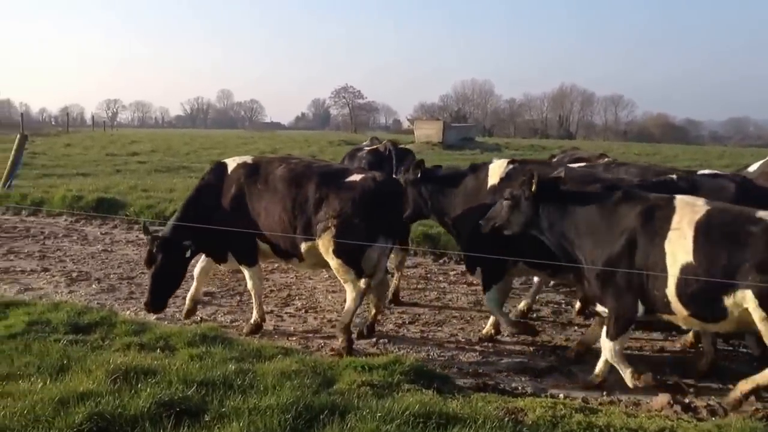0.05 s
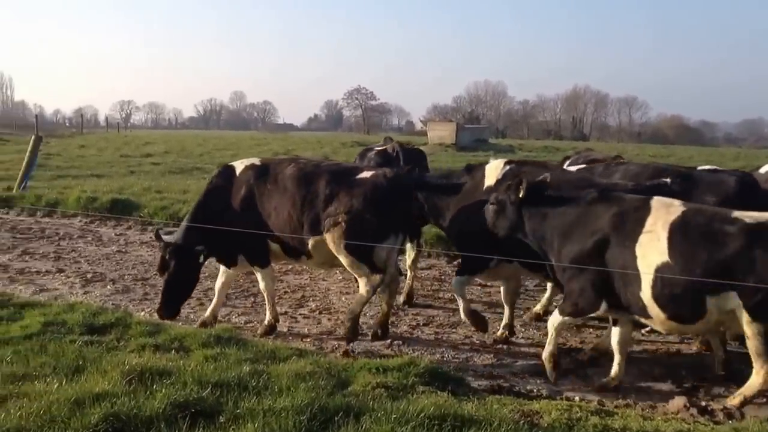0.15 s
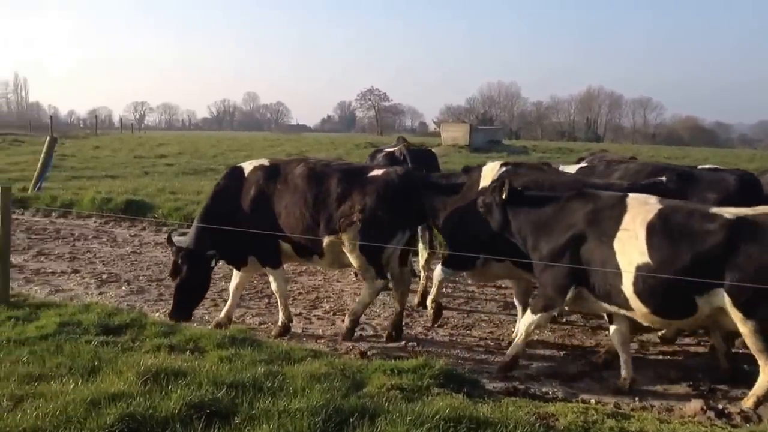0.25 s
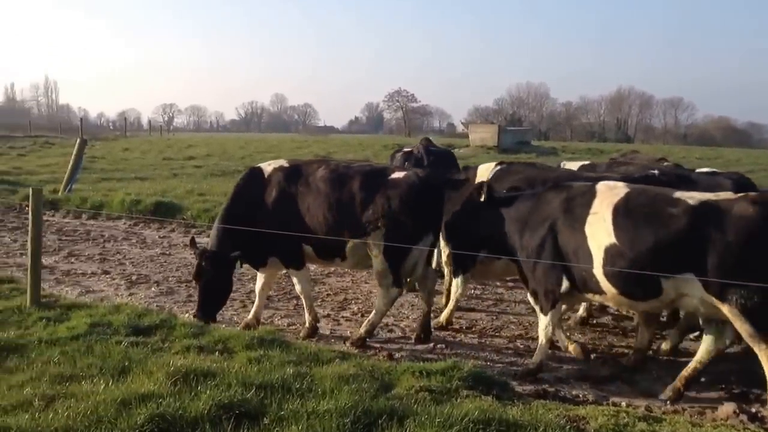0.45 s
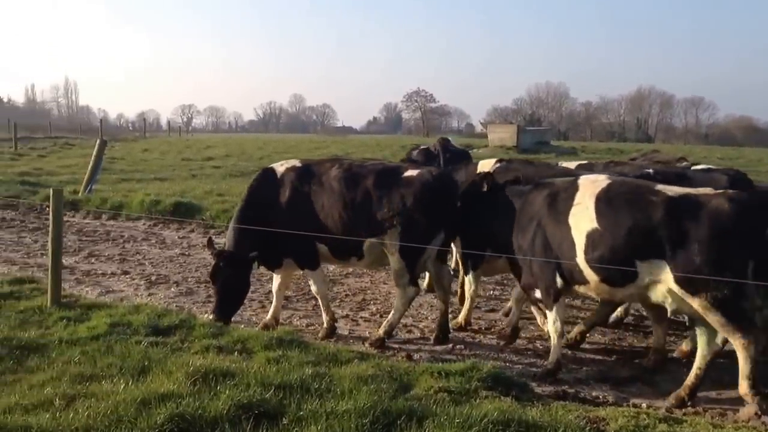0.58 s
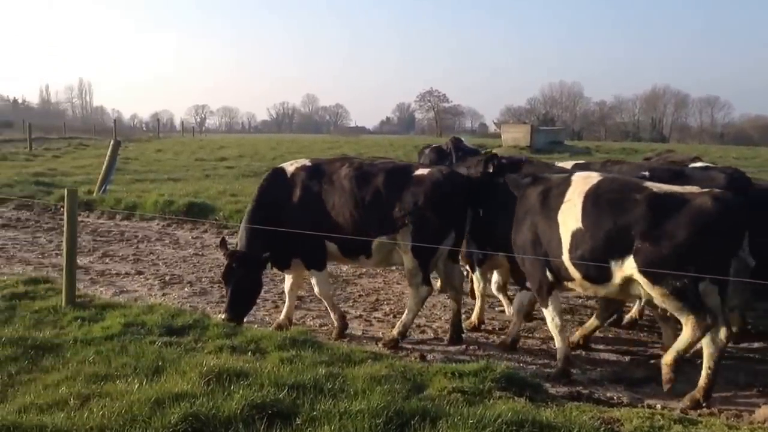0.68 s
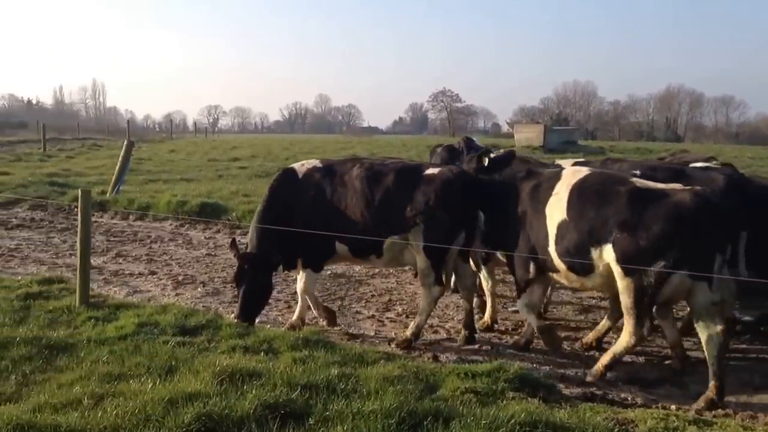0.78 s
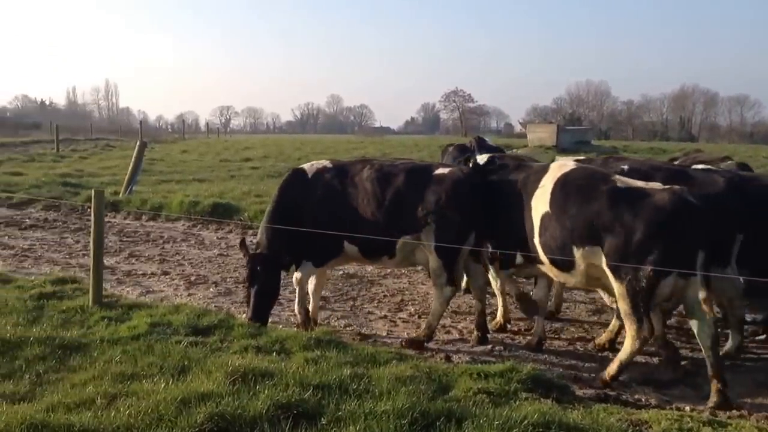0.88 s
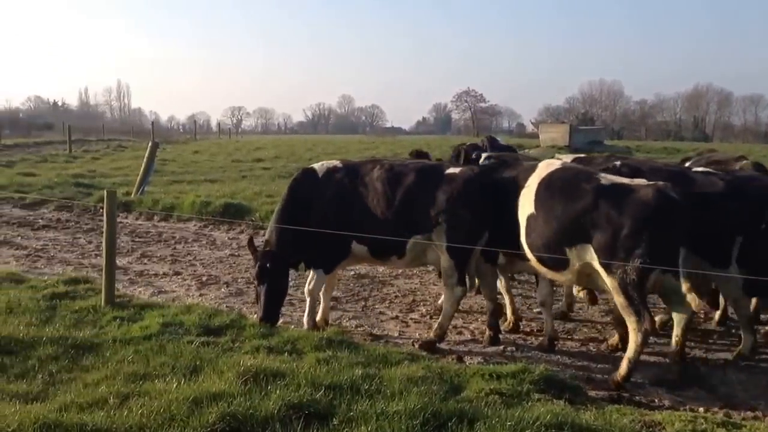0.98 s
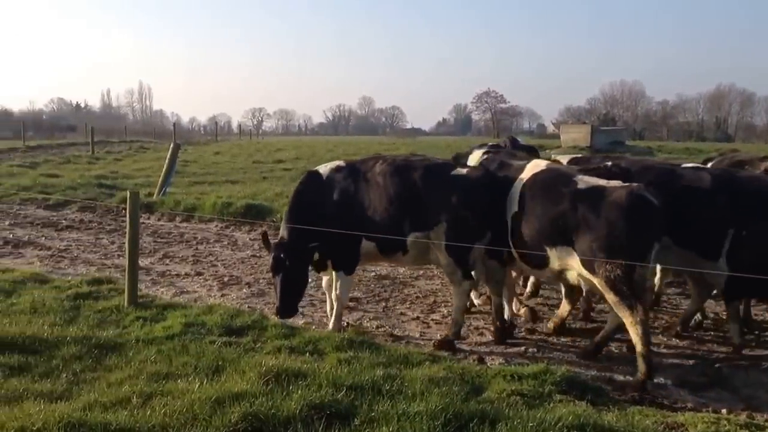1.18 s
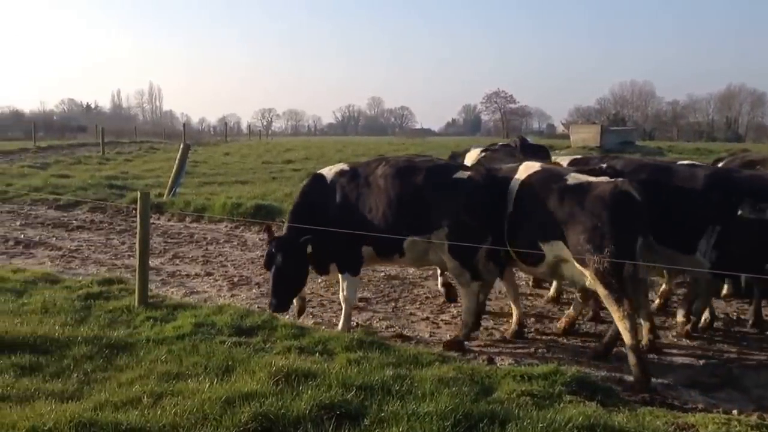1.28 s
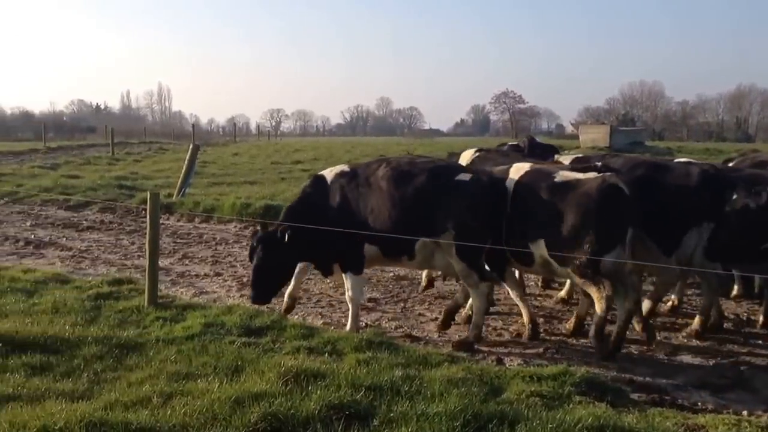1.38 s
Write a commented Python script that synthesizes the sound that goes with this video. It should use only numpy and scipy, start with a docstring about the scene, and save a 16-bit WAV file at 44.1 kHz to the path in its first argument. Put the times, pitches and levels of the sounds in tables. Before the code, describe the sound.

A herd of cows treads through mud outdoors, making wet squelches over faint hiss and a distant hum. Wind soon bumps the microphone in low, irregular gusts, then drops so the nearby hoof steps stand out.

```python
"""A herd of cows walks over a muddy track in an open field, a few metres away.
First, over faint outdoor hiss and a far hum, wet mud crackles and a hoof squelches.
A brief early gust bumps the microphone; from 0.2 s to 1 s uneven gusts buffet it with low thumps.
Then the wind drops and the squelches stand clear, each ringing a pocket of air trapped in the mud."""
import sys
import numpy as np
from scipy import signal
from scipy.fft import rfft, irfft
from scipy.io import wavfile

SR = 44100
rng = np.random.default_rng(int(sys.argv[2]) if len(sys.argv) > 2 else 0)


def wrap_up_sound(samples):
    """Save the sound to the file named by the first command line argument, as 16-bit audio."""
    columns = np.atleast_2d(samples).T
    # keep every value between -1 and 1, then stretch to whole-number steps
    tamed = np.clip(columns, -1, 1)
    steps = np.round(tamed * 32767).astype(np.int16)
    wavfile.write(sys.argv[1], SR, steps)


N = 63945
TIME, HZ = np.arange(N) / SR, np.fft.rfftfreq(N, 1 / SR)


def amp(db):
    """The decibel scale: 20 dB is a factor of ten in amplitude."""
    return 10 ** (np.asarray(db) / 20)


def unit_rms(x):
    """Normalisation to a root mean square of 1."""
    return x / np.sqrt(np.mean(x ** 2) + 1e-20)


def spectrum(points):
    """Gain per frequency, interpolated in log frequency between (f/Hz, level/dB) points."""
    hz, db = np.transpose(points)
    return amp(np.interp(np.log(HZ + 1), np.log(hz), db))


def envelope(points, column=1):
    """Gain per sample, interpolated in time along one dB column of a table."""
    columns = np.transpose(points)
    return amp(np.interp(TIME, columns[0], columns[column]))


def colour(x, gain):
    """Linear filtering: the spectrum is multiplied by a gain per frequency."""
    return irfft(rfft(x) * gain, N)


def noise():
    """White noise: independent samples give a flat mean spectrum."""
    return rng.standard_normal(N)


def wobble(hz):
    """Random modulation: noise of rms 1, low-passed near hz."""
    return unit_rms(colour(noise(), np.exp(-(HZ / hz) ** 2)))


def resonance(hz, width_hz):
    """Response of a damped resonator, with gain 1 at its centre."""
    return 1 / (1 + 2j * (HZ - hz) / width_hz)


def eddies(push, bright_hz, thin, top_hz=1620, low_cut_hz=160.8):
    """Band limiting rounds each push into a bump; the microphone's low cut makes it swing back."""
    bass_thinning = ((HZ + 1) / bright_hz) ** max(thin, 0)
    gain = np.exp(-HZ / bright_hz) * bass_thinning / np.sqrt(1 + (HZ / top_hz) ** 6)
    low_cut = signal.butter(4, low_cut_hz, "high", fs=SR, output="sos")
    return signal.sosfilt(low_cut, colour(push, gain))


def field():
    """Ambient noise: a broad band is heard as open-air hiss, a narrow band as a far hum."""
    # spectrum of the open air: f/Hz, relative level/dB
    air_spectrum = [(20, -6), (60, 12), (250, 1), (500, -14), (1500, 10.5), (3000, -31), (8000, -33),
                    (15000, -26)]
    hum = unit_rms(colour(noise(), abs(resonance(hz=250.6, width_hz=9.6)) ** 2))
    hiss = unit_rms(colour(noise(), spectrum(air_spectrum)))
    return amp(-65.5) * hiss + amp(-53.5) * hum


def herd(crackles_per_s=900, shelf_hz=8500):
    """Incoherent summation: many farther hooves merge into a wet wash with crackle."""
    # wet background hiss, which ducks during the strongest gusts: t/s, level/dB, treble shelf/dB
    wash_levels = [(0, -59.5, 5.5), (.06, -56, 9), (.075, -55, 1), (.13, -51.5, 5), (.175, -56.5, -3),
                   (.21, -53.5, 1.5), (.3, -55.5, 7), (.38, -51.5, -8), (.44, -59, -5), (.49, -59, 3),
                   (.56, -51.5, -4), (.61, -57, -1.5), (.7, -51.5, -0.5), (.8, -53, 2.5), (.92, -48.5, -1),
                   (1.06, -51, -0.5), (1.16, -51, -0.5), (1.29, -55, -1.5), (1.38, -51, -1.5),
                   (1.45, -59.5, -3)]
    # spectrum of the wet hiss: f/Hz, relative level/dB
    wash_spectrum = [(100, -25), (500, 4), (900, 3.5), (1600, 0), (2200, -0.5), (3000, -4.5), (4500, -5),
                     (5200, -7), (8300, -7.5), (9800, -15), (12500, -11), (15200, -17)]
    grains = noise() * amp(5.5 * np.minimum(rng.exponential(1, N), 4))
    crackle = unit_rms(grains * (rng.random(N) < crackles_per_s / SR))
    wash = noise() * amp(1.42 * wobble(hz=49)) + amp(-10) * crackle
    wash = unit_rms(colour(wash, spectrum(wash_spectrum)))
    treble = colour(wash, HZ ** 4 / (HZ ** 4 + shelf_hz ** 4))
    return envelope(wash_levels) * (wash + (envelope(wash_levels, column=2) - 1) * treble)


def squelches(pocket_q=5.4, pocket_db=5.5, overtone_db=-7, grain_db=2.5):
    """Cavity resonance: each hoof presses a grainy spurt from the mud, and trapped air rings in it."""
    # hooves in mud: t/s, level/dB, rise/s, decay/s, low tilt/dB, high tilt/dB, air pocket f/Hz
    steps = [(0.009, -45, 0.0015, 0.011, -6, -9, 1640), (0.093, -41, 0.013, 0.012, 7.5, 9, 763),
             (0.198, -50, 0.0023, 0.0055, 11, 19, 3500), (0.234, -41, .004, .03, 23, 13, 2540),
             (0.3187, -31, 0.0009, 0.003, 9, 2.5, 740), (.327, -48, .003, 0.0095, -4, -4, 1420),
             (0.532, -42.5, 0.0023, 0.0055, 11, 8.5, 7000), (.72, -55, .004, .01, -4, 6, 2020),
             (0.8458, -42.5, 0.0024, 0.0021, -8, 9.5, 12500), (.949, -48, .001, 0.0022, -8, 10, 13000),
             (1.075, -39.5, 0.0008, 0.0014, 4, 13, 3540), (1.099, -51.5, 0.0032, .012, -9, 13, 6540),
             (1.1743, -35, .001, 0.0045, 0, 1, 4100), (1.196, -41.5, 0.0098, 0.018, 0, 0, 1240),
             (1.2104, -36, 0.00059, 0.0016, -15, -4, 2300), (1.248, -49, .002, 0.0056, 18, 8, 6200),
             (1.359, -48.5, 0.0025, 0.036, -20, 9, 3730), (1.393, -52.5, 0.0033, 0.011, -5, 4, 3000)]
    # spectrum of wet mud: f/Hz, relative level/dB
    mud_spectrum = [(100, -26), (400, -13), (750, 3), (1500, 1.5), (2400, -3), (4300, -4), (5500, -9),
                    (8400, -12), (10000, -25), (15000, -17)]
    sound = np.zeros(N)
    for start, db, rise_s, decay_s, low_db, high_db, pocket_hz in steps:
        t = TIME - start
        shape = np.clip(t / rise_s, 0, 1) * np.exp(-np.maximum(t - rise_s, 0) / decay_s)
        width_hz = pocket_hz / pocket_q
        overtone = amp(overtone_db) * resonance(2 * pocket_hz, width_hz)
        pocket = amp(pocket_db) * (resonance(pocket_hz, width_hz) + overtone)
        tilt = spectrum([(900, low_db), (3000, 0.0092), (9000, high_db)])
        spurt = noise() * shape * amp(grain_db * wobble(hz=600))
        spurt = colour(spurt, spectrum(mud_spectrum) * tilt * (1 + pocket))
        sound += amp(db) * unit_rms(spurt) * np.sqrt(np.mean(shape ** 2))
    return sound


def gust(start, length, db, bright_hz, thin, rise_s=0.007, fall_s=0.0062):
    """Turbulent pressure: a lumpy burst of low noise rises, holds and decays."""
    t = TIME - start
    rise = np.clip(t / rise_s + .5, 0, 1)
    fall = np.exp(-np.maximum(t - length + fall_s / 2, 0) / fall_s)
    push = noise() * rise * fall * amp(2 * wobble(hz=75))
    return amp(db) * unit_rms(eddies(push, bright_hz, thin)) * np.sqrt(length * SR / N)


def early_gust():
    """A pressure transient: a brief early gust bumps the microphone with a soft low thump."""
    # puff of wind: t/s, length/s, level/dB, brightness f/Hz, bass-thinning exponent
    puff = [(0.096, 0.0076, -34.5, 201, 0.56)]
    return sum(gust(*row) for row in puff)


def buffet(start, db, bright_hz, thin):
    """Impulse response: one hard eddy pushes or pulls at the microphone."""
    push = np.zeros(N)
    push[round(start * SR)] = rng.choice([-1, 1])
    bump = eddies(push, bright_hz, thin)
    return amp(db + 0.5) * bump / abs(bump).max()


def wind():
    """Turbulence: breeze, gusts and their hardest eddies make the pressure at the microphone swing."""
    # light breeze between gusts: t/s, level/dB
    breeze_levels = [(0, -52), (.06, -54), (.175, -52.5), (.2, -31.5), (.32, -39), (.42, -40.5),
                     (.59, -38.5), (.68, -31.5), (.78, -33), (.98, -36.5), (1.03, -48), (1.11, -67),
                     (1.28, -52), (1.38, -42.5), (1.45, -56.5)]
    # gusts: t/s, length/s, level/dB, brightness f/Hz, bass-thinning exponent
    gusts = [(0.187, 0.073, -30.5, 155, 1.47), (0.282, 0.0073, -29.5, 160, .6),
             (0.375, 0.026, -30.5, 162, 0.71), (0.425, 0.041, -29, 200, 0.39),
             (.479, 0.036, -24, 209, 0.36), (0.524, 0.043, -23, 288, 0.39), (0.618, 0.024, -27, 170, 1),
             (0.664, 0.057, -27.5, 151, 0.92), (0.716, 0.035, -28, 284, 0.18),
             (0.794, 0.043, -29, 201, 0.91), (0.856, 0.017, -29, 120, 0.61), (0.898, 0.029, -28, 217, 0.36),
             (0.935, 0.031, -24.5, 203, 0.55), (.984, 0.022, -31.5, 122, 0.43),
             (1.013, 0.074, -38.5, 89.5, 0.32), (1.161, 0.085, -34, 75.7, 1.06),
             (1.318, 0.024, -33.5, 44.3, 2.34), (1.341, 0.029, -40.5, 50, 1.1)]
    # hard eddies: t/s, relative peak level/dB, brightness f/Hz, bass-thinning exponent (floored at 0)
    buffets = [(0.203, -6.5, 157, 2.0), (0.2228, -19.5, 85, 5.5), (0.2364, -18.5, 92, 1.5),
               (0.2463, -12.5, 120.0, 2.5), (0.265, -11.5, 88, 3.0), (0.3654, -16.5, 96.5, 2),
               (0.3913, -18.5, 180.0, -1), (0.408, -22, 99, 1), (0.4322, -18.5, 263, 2),
               (0.4374, -11.5, 238, 0.5), (0.4565, -12.5, 89.5, 1.5), (0.4617, -13.5, 192, 1.0),
               (0.4921, -13.5, 91, 2.5), (0.5097, -23.5, 180.0, 3), (0.5268, -16.5, 120.0, 5),
               (0.533, -15, 368, 1), (0.5469, -7, 92, 1.5), (0.553, -14, 187, 3.5), (0.5586, -5, 194, 1),
               (0.6222, -16.5, 89, 5), (0.6301, -8.5, 272, 0.5), (0.6392, -12.0, 92, 0.5),
               (0.702, -17, 260.0, 0.5), (0.7058, -18.5, 90.5, 1.5), (0.7223, -15, 260.0, -3.5),
               (0.7315, -16, 260.0, 2.0), (0.7476, -13.0, 91, 2.5), (0.7541, -19, 250, 0.5),
               (0.759, -17.5, 260.0, 1), (0.8017, -15.5, 94, 0.5), (0.8138, -16, 264, 1),
               (0.8251, -17, 89, 3.0), (0.8862, -26.5, 90, 3.5), (0.9037, -17.5, 90.0, -2),
               (0.9383, -17, 302, 0), (0.9445, -15, 144, 0.0), (0.96, -10.5, 87, 3.0),
               (0.9655, -21.5, 300, 1.5), (1.1377, -24, 88, 0)]
    breeze = envelope(breeze_levels) * unit_rms(eddies(noise(), bright_hz=104, thin=0.19))
    return breeze + sum(gust(*row) for row in gusts) + sum(buffet(*row) for row in buffets)


def scene():
    """Superposition: hooves, wind, herd and field add at one microphone."""
    return (squelches() + early_gust() + wind() + herd() + field())[None]


def record(dry, edge_hz=15400):
    """Band limiting: a linear-phase low-pass removes the highest treble."""
    low_pass = signal.firwin(1023, edge_hz, window=("kaiser", 9), fs=SR)
    return signal.oaconvolve(dry, low_pass[None], "same")


dry = scene()
out = record(dry)
wrap_up_sound(out)
```